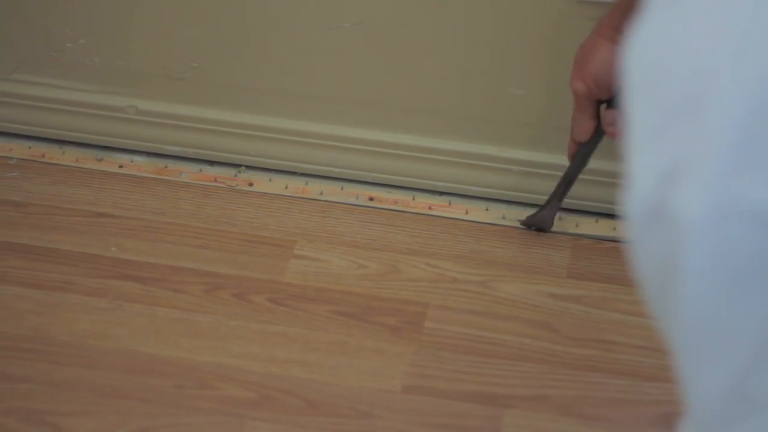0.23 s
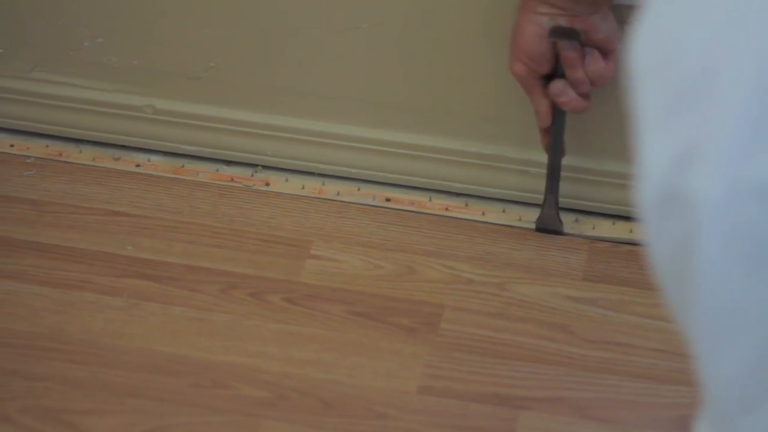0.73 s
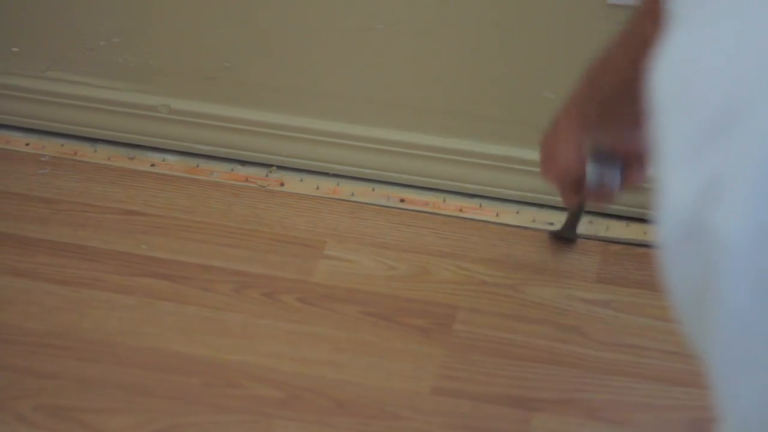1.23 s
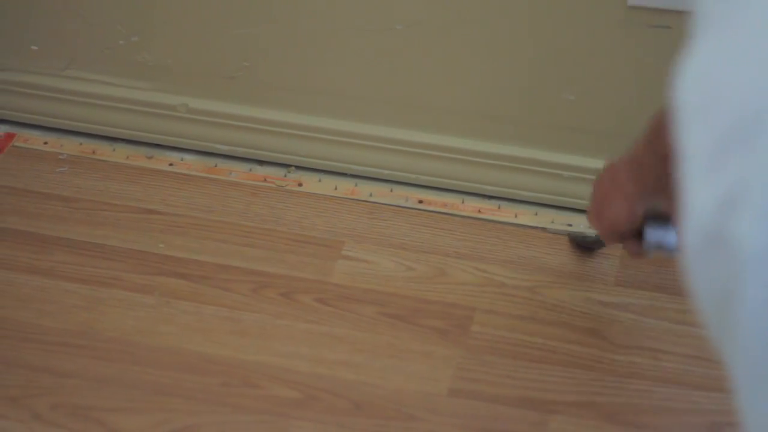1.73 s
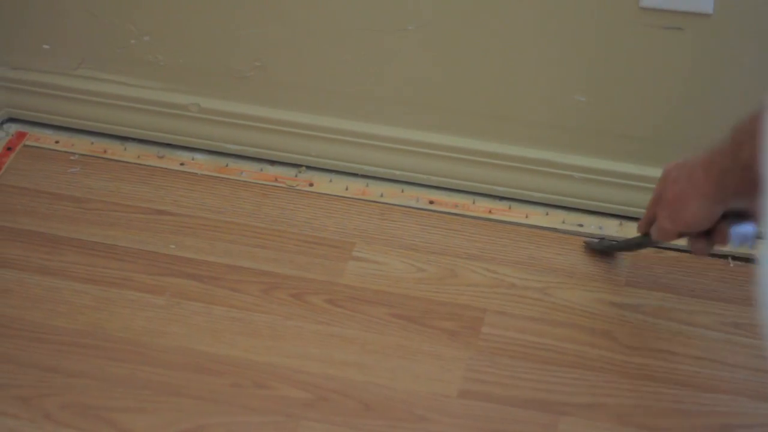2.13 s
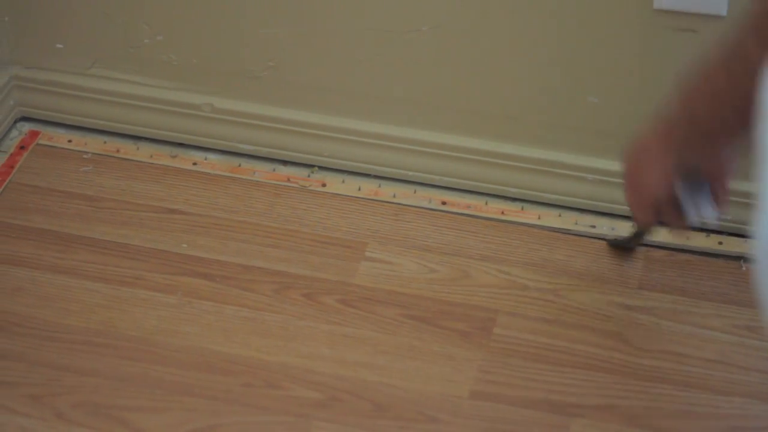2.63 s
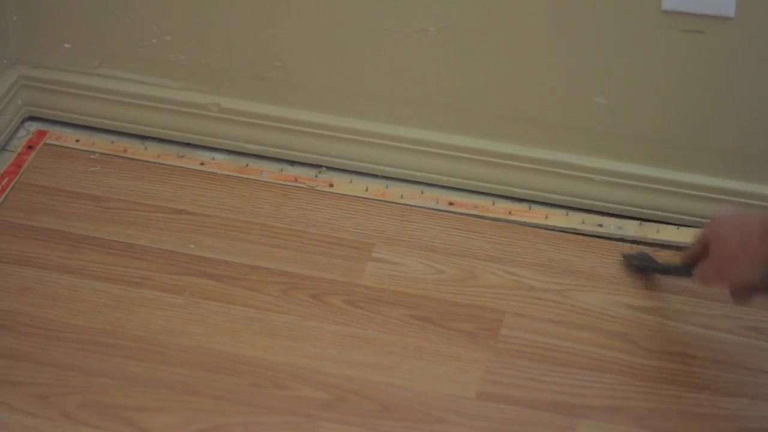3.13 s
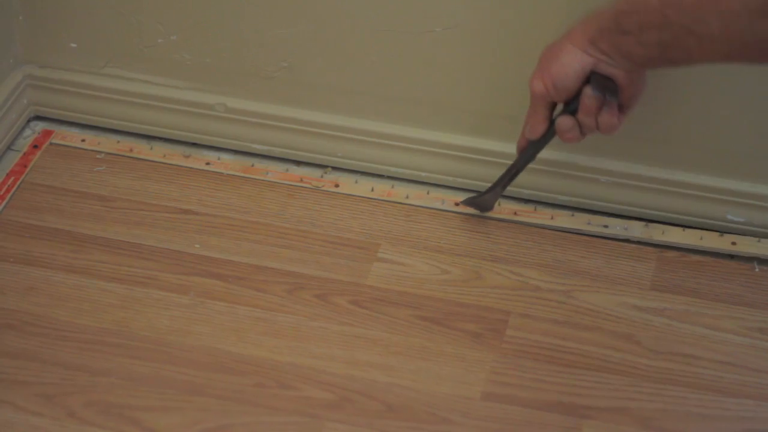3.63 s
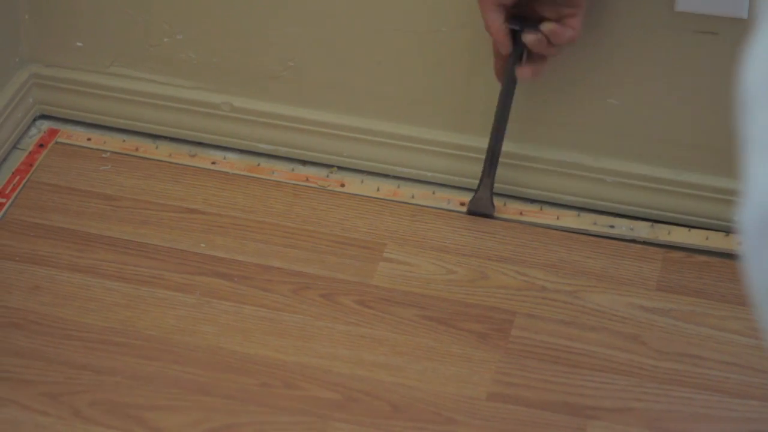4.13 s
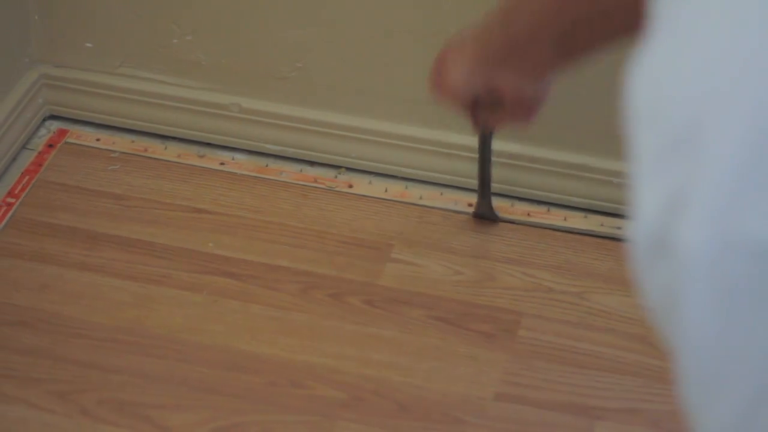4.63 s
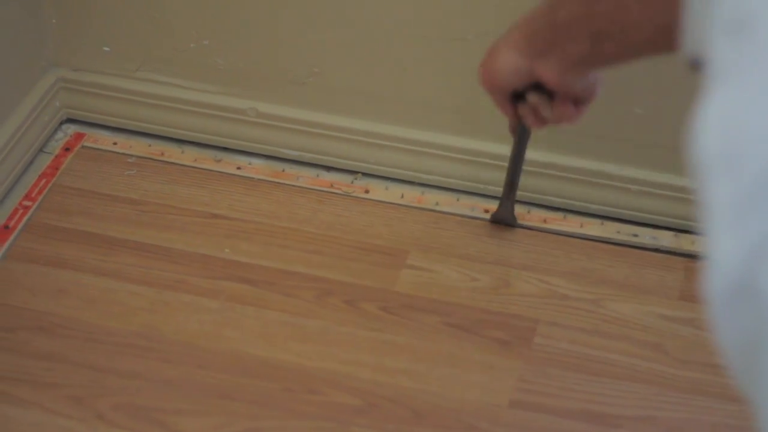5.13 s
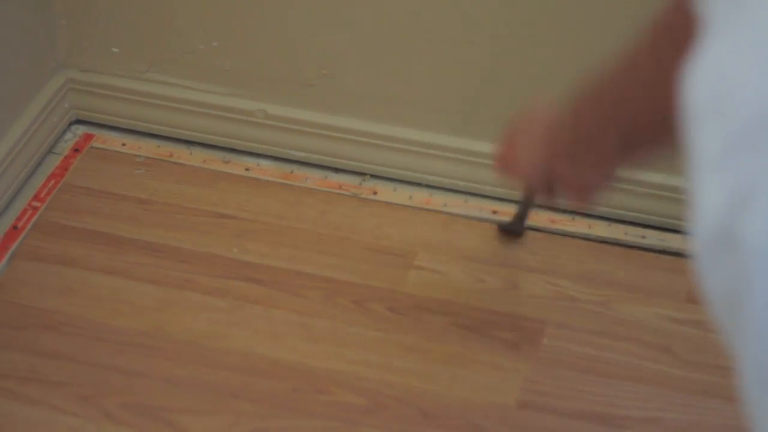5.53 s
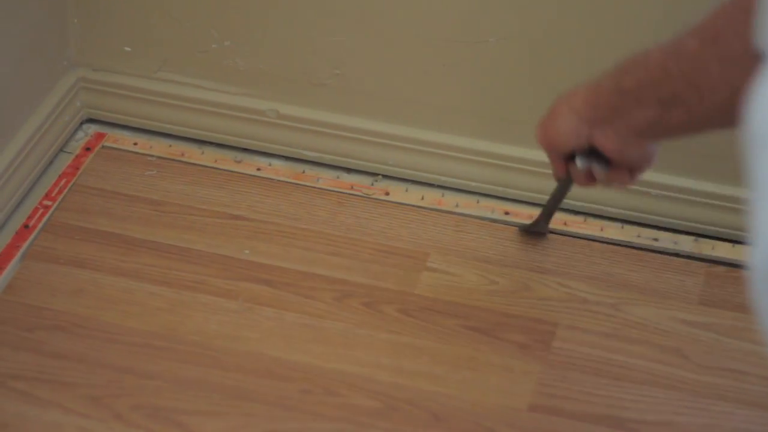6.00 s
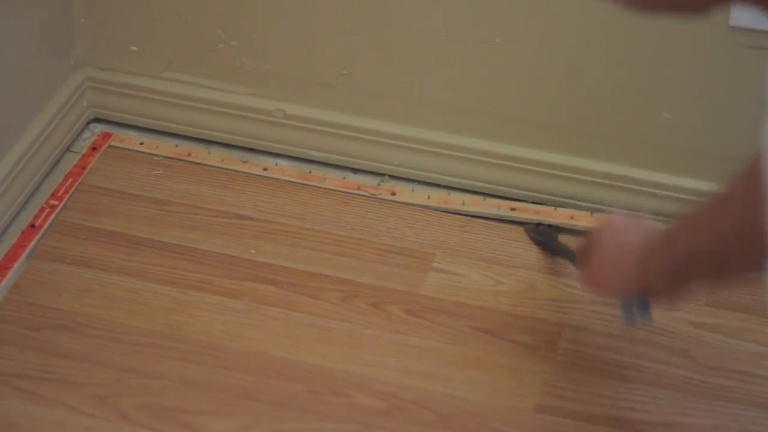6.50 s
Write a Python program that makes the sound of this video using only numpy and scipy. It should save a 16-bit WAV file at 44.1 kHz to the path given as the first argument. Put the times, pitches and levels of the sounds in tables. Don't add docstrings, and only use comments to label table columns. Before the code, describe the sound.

A steel bar pushes and levers a wooden strip on a laminate floor in a small bare room, close microphone. Muted taps and nudges, dull floor thuds, faint grinding and stick-slip creaking alternate with near-quiet gaps. Later the nails let go abruptly: a sharp bright crack with a woody knock, a second similar one, then brisk snaps and little scrapes over constant soft hiss.

```python
import sys
import numpy as np
from scipy import signal
from scipy.fft import rfft, irfft
from scipy.io import wavfile

SR = 44100
rng = np.random.default_rng(int(sys.argv[2]) if len(sys.argv) > 2 else 0)


def to_linear_factor(level_db):
    exponent = np.asarray(level_db, float) / 20
    return 10 ** exponent


def dump_mix(stems):
    frames = np.atleast_2d(stems).T
    limited = np.clip(frames, -1, 1)
    pcm = np.round(limited * 32767).astype(np.int16)
    wavfile.write(sys.argv[1], SR, pcm)


N = 298108

# (frequency [Hz], density [dB per Hz])
HISS_SPECTRUM = [(25, -34), (60, -19), (120, -15), (400, -14), (650, -12), (1100, -15), (1500, -14.5),
                 (5000, -15.5), (14800, -15), (16000, -24)]
HISS_LEVEL_DB = -68
# (middle [s], half length [s], level [dB])
GRIT_SWELLS = [(0.014, 0.069, -59.5), (0.122, 0.037, -72), (1.25, 0.26, -67), (1.884, 0.2, -82),
               (2.106, 0.32, -72.5), (2.373, 0.11, -60.5), (2.67, 0.036, -72), (3.002, 0.15, -63.5),
               (3.3, 0.06, -59), (5.797, 0.062, -65.5), (6.508, 0.07, -63.5)]
# (middle [s], half length [s], board groan [dB], strip creak [dB])
LEANS = [(.03, .12, -66, -60.5), (.45, 0.08, -68, -72), (.77, 0.083, -82, -69), (1.03, 0.17, -60, -78),
         (1.32, 0.14, -79, -65), (1.47, 0.089, -66, -78), (1.79, 0.15, -65, -96), (1.94, 0.23, -70, -65.5),
         (2.14, 0.084, -61, -67.5), (2.4, 0.14, -61.5, -64.5), (2.65, 0.032, -67, -56),
         (2.88, 0.066, -53.5, -61), (2.99, 0.083, -49, -68), (3.07, 0.046, -67, -59),
         (3.2, 0.2, -54.5, -71), (3.46, 0.16, -79, -67.5), (3.9, 0.18, -68, -70.5), (4.15, 0.19, -63, -65),
         (4.37, 0.052, -56, -69), (4.53, 0.055, -68, -70.5), (4.92, 0.15, -85, -66), (5.08, 0.3, -68, -65),
         (5.27, 0.017, -70, -75), (5.4, 0.048, -68, -73.5), (5.74, 0.12, -72, -73.5),
         (5.92, 0.064, -56, -68), (6.22, 0.18, -62, -60.5), (6.48, 0.074, -51, -57), (6.68, 0.27, -60, -63)]
GROAN_REST_DB, CREAK_REST_DB = -71.5, -77.5
# (middle [s], half length [s], level [dB])
KNEE_SWELLS = [(.45, .05, -63), (.77, .04, -45), (1.92, .05, -73), (2.14, .06, -65), (2.39, .05, -70),
               (2.65, .05, -71), (3.1, 0.11, -57), (3.35, 0.11, -59), (5.03, 0.018, -31),
               (5.76, 0.043, -46), (5.91, 0.026, -33), (6.48, .04, -55)]
KNEE_REST_DB = -90

# (frequency [Hz], level [dB], t60 [s])
BOARD_MODES = [(82, -34, 0.11), (98.5, -0.5, 0.2), (114.4, 0.7, 0.15), (128.7, -6, 0.09),
               (154.6, 2.5, 0.15), (176.6, -1, 0.11)]
STRIP_LOW_MODES = [(227.7, -13, 0.053), (295, -6.5, 0.14), (345.7, -2.1, 0.1), (407, -2.5, 0.07),
                   (441, -0.5, 0.056), (494, -11.5, 0.092)]
STRIP_HIGH_MODES = [(582, 0.5, 0.067), (635, -4, 0.11), (708, 1, 0.046), (805, -5, 0.069),
                    (875.7, -4.5, 0.08), (916, -1, 0.033), (985, -6, 0.082), (1132, -0.5, 0.035),
                    (1247, -1, 0.035)]
STRIP_TOP_MODES = [(1496, 0, 0.088), (1628, 3, 0.042), (2130, -18, 0.029), (2320, 16.5, 0.036)]
BAR_MODES = [(1580, -18, .02), (2060, -2, .022), (2250, -3, .022), (3230, -1, .025), (3470, -1, .025),
             (4150, -2, .022), (4400, -2, .022), (5450, -4, .022), (6450, -5, .02), (7470, -10, .016),
             (8700, -9, .014), (9730, -6, .014), (11750, -5, .014), (13300, -4, .014)]

# (time [s], low modes [dB], high modes [dB], brightest frequency [Hz], ring time scale [1])
BLOWS = [(.063, -42.5, -53, 900, 1), (.083, -40.5, -48, 870, 0.9), (.119, -42, -44, 1025, 0.72),
         (.127, -31, -38.5, 570, 0.52), (.423, -39.5, -47, 890, 0.45), (.44, -37.5, -42, 550, 0.69),
         (1.21, -45, -47.5, 710, 0.84), (2.107, -41, -44.5, 650, 0.86), (2.419, -43.5, -37, 780, 0.68),
         (2.428, -43.5, -43, 1200, .8), (2.678, -36.5, -41.5, 690, 0.79), (2.941, -40, -45, 615, 1.7),
         (2.963, -31.5, -31, 589, 1.02), (3.24, -51, -49, 600, 2.5), (3.262, -46, -47, 705, 3.7),
         (3.297, -29, -28, 630, 0.8), (3.725, -36.5, -36, 635, 0.69), (3.986, -39, -41.5, 890, 0.93),
         (4.061, -42.5, -48, 640, 1), (4.689, -62, -50.5, 716, 0.74), (5.016, -28.5, -19, 857, 0.84),
         (5.045, -42.5, -29.5, 985, 0.96), (5.75, -39, -30.5, 750, 0.5), (5.901, -26, -17, 854, 0.57),
         (5.928, -46, -33, 960, 0.6), (6.453, -36, -26, 916, 0.38), (6.494, -38, -42, 710, 1.1),
         (6.514, -35, -33.5, 697, 1.55)]
# (time [s], low modes [dB], high modes [dB], boards [dB])
NUDGES = [(.05, -50, -67, -66), (.733, -47, -62, -64), (0.771, -59, -56, -68), (.8, -64, -58, -69),
          (.942, -60, -69, -57), (1.013, -52.5, -66, -46.5), (1.261, -52.5, -67, -69),
          (1.704, -46, -62, -64), (1.852, -57, -52.5, -51), (1.954, -62, -61, -57), (1.976, -53, -55, -65),
          (2.146, -50, -64, -50), (2.388, -47, -62, -61), (2.63, -50, -51, -42.5), (2.73, -49.5, -63, -45),
          (2.856, -50, -65, -45), (3.027, -46, -51, -59), (4.087, -63, -64, -43), (4.359, -50, -49, -42),
          (4.883, -61, -77, -54), (5.222, -48, -46.5, -41.5), (5.324, -68, -65, -52),
          (5.768, -43, -49, -79), (5.795, -50.5, -41, -72), (5.89, -38, -46, -65), (6.03, -42, -68, -52),
          (6.258, -47.5, -42.5, -45), (6.322, -49, -44.5, -43), (6.678, -65, -53, -61)]
NUDGE_STRIP_HZ, NUDGE_BOARDS_HZ, NUDGE_RING_SCALE = 657, 110, 1.1
# (time [s], peak level [dB], main frequency [Hz], ring time scale [1])
THUDS = [(.084, -45, 206, 0.85), (.122, -43, 121, 0.96), (.429, -46.5, 102, 1.9), (.733, -37.5, 115, 0.43),
         (.774, -48.5, 104, 1.2), (.81, -52, 105, 1), (1.117, -39.5, 105, 0.86), (1.175, -50, 100, 1.1),
         (1.214, -54, 104, 0.75), (1.592, -48.5, 107, 1.6), (1.704, -45.5, 111, 0.68),
         (1.704, -45.5, 213, 0.76), (2.034, -51, 100, 1.1), (2.098, -47.5, 156, 0.73),
         (2.413, -44, 198, 1.24), (2.68, -34.5, 102, 0.9), (2.68, -34, 202, .6), (2.86, -42, 129, 1.3),
         (2.933, -45, 136, .88), (2.962, -38, 89, 1), (3.025, -36, 109, 0.89), (3.052, -36, 102.5, 1),
         (3.093, -46, 95, 1.3), (3.289, -39.5, 102.3, 1.4), (3.725, -39, 130, 1), (3.986, -46, 167, 0.82),
         (4.423, -54, 95, 1.4), (5.014, -25.5, 129, 1.3), (5.044, -37, 131, 0.75), (5.751, -52, 124, 1.05),
         (5.9, -28.5, 136.4, 1.1), (6.395, -49, 116, 1.2), (6.454, -49, 105, 0.55), (6.52, -36, 139, 1),
         (6.55, -47, 110, 1.5)]
# (time [s], level [dB], frequency [Hz], t60 [s])
SWINGS = [(.08, -44, 215, .1), (.121, -56, 2300, .04), (.44, -38, 700, .025), (1.02, -52, 220, .08),
          (1.96, -60, 1300, .15), (2.108, -48, 220, .09), (2.682, -58, 2250, .04), (4.085, -48, 280, .07),
          (2.975, -44, 58.7, 1.2), (4.061, -37.5, 663, 0.11), (4.36, -47.5, 674, 0.075),
          (5.017, -27, 1138, 0.09), (5.018, -42, 1290, 0.094), (5.902, -35.5, 1420, 0.074),
          (5.905, -46, 1640, 0.088), (5.901, -16, 789, 0.045), (6.545, -40, 104, 0.97)]
# (time [s], peak level [dB], low treble [dB], top [dB], splinter tail [dB])
SNAPS = [(.4224, -59, -2.5, 0, -2), (1.2103, -43, -11, 2, -7.5), (2.1077, -51, -21, -4, -6),
         (2.39, -37.5, -19, -3.5, -21), (2.412, -38.5, -9, -8, -26), (2.9616, -55, -3, 0, -2),
         (3.2915, -52.5, -23, -3, 2.5), (3.7298, -62, 7, -9, -1.5), (5.018, -18, -10, -3, -41),
         (5.0457, -42, -20, 6, -12), (5.2023, -49, 3, -1, -26), (5.7515, -25, -13.5, -0.5, -23),
         (5.768, -38.5, -27, 0, -7.5), (5.7947, -37.5, -34, 5.5, -25), (5.81, -47, -27, 8, -16),
         (5.9012, -18, -9, -37, -14), (6.3077, -64, -14, 5, 7.5), (6.454, -18.5, -18, -5, -22.5),
         (6.4755, -39, -27, 0, -8)]
# (time [s], peak level [dB], top [dB])
TICKS = [(.1157, -47, 2.5), (.8024, -58, 3), (1.1134, -62, 5), (1.2338, -47.5, -7), (1.5843, -59.5, 3),
         (1.7458, -56.5, -6), (1.8312, -55.5, 5), (1.8538, -52.5, 7), (1.8737, -53, 5), (1.9144, -57, 4),
         (1.945, -61, -11), (2.068, -55, -1), (2.425, -54, -15), (2.6317, -57, -2), (2.68, -56, -2),
         (4.3523, -58, -10), (4.3894, -61, 3), (6.5197, -45, -3), (3.2552, -58, -5), (5.915, -42, -15),
         (5.945, -48, -15), (6.325, -56, 0), (6.583, -58, -10), (6.035, -57, -8), (6.078, -57, -3),
         (6.09, -58, -3), (6.235, -62, 2), (6.28, -59, 2)]
TICK_LOW_DB, TICK_TAIL_DB = -5, -6
# (start [s], length [s], level [dB], brightest frequency [Hz])
DRAGS = [
    (3.25, .04, -66, 3500),
    (3.3, 0.051, -56.5, 5560),
    (3.317, .025, -62, 9800),
    (5.907, .05, -53.5, 5200),
    (6.452, 0.036, -50, 6550),
]
# (time [s], level [dB], t60 [s])
BAR_SLIP = (5.017, -52, 0.17)


def rms_one(x):
    return x / np.sqrt(np.mean(x ** 2) + 1e-20)


def band(x, low_hz, high_hz):
    sos = signal.butter(2, [low_hz, min(high_hz, .45 * SR)], "band", fs=SR, output="sos")
    return signal.sosfilt(sos, x)


def add(out, s, sound):
    i = int(s * SR)
    out[i:i + len(sound)] += sound[:N - i]


def swells(rows, column):
    t = np.arange(N) / SR
    return sum(to_linear_factor(row[column]) * np.exp(-((t - row[0]) / row[1]) ** 2) for row in rows)


def grains(per_s, spread_db):
    sizes = to_linear_factor(spread_db * np.minimum(rng.exponential(1, N), 4))
    signs = rng.choice([-1, 1], N)
    return sizes * signs * (rng.random(N) < per_s / SR)


def ring(force, modes):
    out = 0
    for hz, db, t60 in modes:
        radius = to_linear_factor(-60 / (t60 * SR))
        angle = 2 * np.pi * hz / SR
        poles = [1, -2 * radius * np.cos(angle), radius * radius]
        out = out + signal.lfilter([0, to_linear_factor(db) * np.sin(angle)], poles, force + 1e-18)
    return out


def struck(modes, scale, luck, rise_s, centre_hz, focus_db, scatter_rad=1.58, detune=0.022, uneven_db=3.0):
    t = np.arange(int(.4 * SR)) / SR
    contact_mode = (centre_hz, 2.0, 0.77 * modes[2][2])
    hz, db, t60 = np.transpose([*modes, contact_mode])[:, :, None]
    pitch_luck, phase_luck, level_luck = luck[:3 * len(hz)].reshape(3, -1, 1)
    db = db + uneven_db * level_luck - focus_db * np.abs(np.log2(hz / centre_hz))
    waves = np.sin(2 * np.pi * hz * (1 + detune * pitch_luck) * t + scatter_rad * phase_luck)
    decay = to_linear_factor(db - 60 * t / (t60 * np.clip(scale, .2, 5)))
    sound = (decay * waves).sum(0) * (1 - np.exp(-t / rise_s))
    return sound / np.abs(sound).max()


def hiss():
    hz, db = np.transpose(HISS_SPECTRUM)
    colour = to_linear_factor(np.interp(np.log(np.fft.rfftfreq(N, 1 / SR) + 1), np.log(hz), db))
    noise = irfft(rfft(rng.standard_normal(N)) * colour, N)
    return noise * to_linear_factor(HISS_LEVEL_DB) / np.std(band(noise, 1500, 15000))


def grit():
    crackle = band(grains(per_s=5000, spread_db=1.0), 1770, 7000)
    return swells(GRIT_SWELLS, column=2) * rms_one(crackle)


def strain():
    groan = rms_one(ring(grains(per_s=430, spread_db=2.5), BOARD_MODES))
    groan = groan * (to_linear_factor(GROAN_REST_DB) + swells(LEANS, column=2))
    slips = signal.lfilter([.1], [1, -.88], grains(per_s=600, spread_db=2.0))
    creak = rms_one(ring(slips, STRIP_LOW_MODES) + to_linear_factor(-1.0) * ring(slips, STRIP_HIGH_MODES))
    creak = creak * (to_linear_factor(CREAK_REST_DB) + swells(LEANS, column=3))
    thump = rms_one(band(rng.standard_normal(N), 38, 72))
    thump = thump * (to_linear_factor(KNEE_REST_DB) + swells(KNEE_SWELLS, column=2))
    return groan * to_linear_factor(-6.0) + creak + thump * to_linear_factor(-17.5)


def room(x):
    t = np.arange(int(.6 * SR)) / SR
    tail = band(rng.standard_normal(len(t)), 158, 6000)
    tail = tail * to_linear_factor(-60 * t / 0.32) * (t > .006)
    return to_linear_factor(-15.5) * signal.fftconvolve(x, tail / np.sqrt(np.sum(tail ** 2)))[:N]


def knocks():
    out = np.zeros(N)
    rows = BLOWS + [(s, low, high, NUDGE_STRIP_HZ, NUDGE_RING_SCALE) for s, low, high, _ in NUDGES]
    for (s, low, high, hz, scale), luck in zip(rows, rng.standard_normal((len(rows), 3, 30))):
        body = struck(STRIP_LOW_MODES, scale, luck[0], rise_s=0.0028, centre_hz=368.7, focus_db=-15.5)
        knock = struck(STRIP_HIGH_MODES, scale, luck[1], rise_s=0.0014, centre_hz=hz, focus_db=10.5)
        click = struck(STRIP_TOP_MODES, scale, luck[2], rise_s=0.00023, centre_hz=1850, focus_db=8.0)
        add(out, s, to_linear_factor(low) * body)
        add(out, s, to_linear_factor(high) * knock)
        add(out, s, to_linear_factor(high - 20.5) * click)
    return out


def thuds():
    out = np.zeros(N)
    rows = THUDS + [(s, db, NUDGE_BOARDS_HZ, NUDGE_RING_SCALE) for s, _, _, db in NUDGES]
    for (s, db, hz, scale), luck in zip(rows, rng.standard_normal((len(rows), 30))):
        thud = struck(BOARD_MODES, scale, luck, rise_s=0.0062, centre_hz=hz, focus_db=14.0, scatter_rad=0.22)
        add(out, s, to_linear_factor(db) * thud)
    return band(out, 46, 4000)


def swings():
    out, t = np.zeros(N), np.arange(SR) / SR
    for s, db, hz, t60 in SWINGS:
        rise = 1 - np.exp(-t * hz / 0.61)
        note = np.sin(2 * np.pi * hz * t * (1 - 0.033 * t)) * rise
        add(out, s, to_linear_factor(db - 60 * t / t60) * note)
    return out


def cracks():
    out, t = np.zeros(N), np.arange(int(.25 * SR)) / SR
    rows = SNAPS + [(s, db, TICK_LOW_DB, top, TICK_TAIL_DB) for s, db, top in TICKS]
    rise, burst = 1 - np.exp(-t / 0.00019), np.exp(-t / 0.0022)
    for (s, db, low, top, tail), noise in zip(rows, rng.standard_normal((len(rows), len(t)))):
        # (level [dB], band edges [Hz], tail decay [s])
        bands = ((low - 5.0, (1250, 3000), .03), (-6.0, (3000, 6500), .026),
                 (-9.0, (6500, 10500), .024), (top - 4.0, (10500, 15500), .02))
        sound = 0
        for level_db, edges, tail_s in bands:
            noise = np.roll(noise, len(t) // 5)
            shape = rise * (burst + to_linear_factor(tail) * np.exp(-t / tail_s))
            sound = sound + to_linear_factor(level_db) * rms_one(band(noise, *edges)) * shape
        add(out, s, to_linear_factor(db) * sound)
    return out


def drags():
    out, t = np.zeros(N), np.arange(int(.2 * SR)) / SR
    rough = grains(per_s=2500, spread_db=3.0)
    for s, length, db, hz in DRAGS:
        held = np.clip(np.minimum(t, length - t) / .004, 0, 1)
        modes = [(f, level - 23 * abs(np.log2(f / hz)), t60 / 2) for f, level, t60 in BAR_MODES]
        sound = ring(rough[int(s * SR):][:len(t)] * held, modes)
        add(out, s, to_linear_factor(db) * sound / np.std(sound[:int(length * SR)]))
    return out


def bar():
    s, db, t60 = BAR_SLIP
    t = np.arange(N) / SR - s
    chatter = rng.standard_normal(N) * to_linear_factor(db - 60 * np.maximum(t, 0) / t60) * (t > 0)
    return ring(chatter, BAR_MODES)


def scene():
    work = grit() + strain() + knocks() + thuds() + swings() + cracks() + drags() + bar()
    return (work + room(work) + hiss())[None]


def low_pass(x):
    return signal.sosfilt(signal.butter(12, 16480, fs=SR, output="sos"), x)


def record(dry):
    cut = signal.sosfilt(signal.cheby2(10, 25, 16200, fs=SR, output="sos"), dry)
    return low_pass(cut)


dry = scene()
out = record(dry)
dump_mix(out)
```